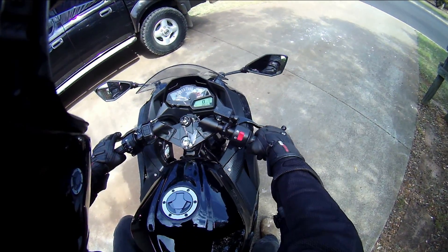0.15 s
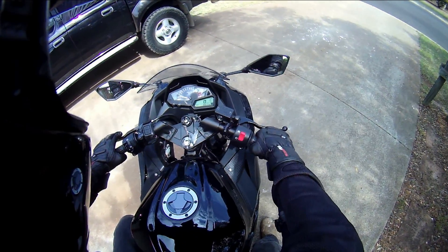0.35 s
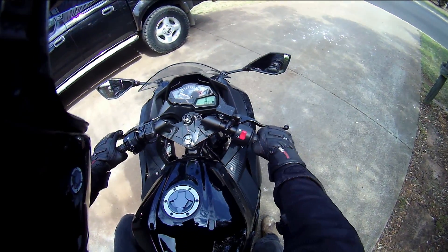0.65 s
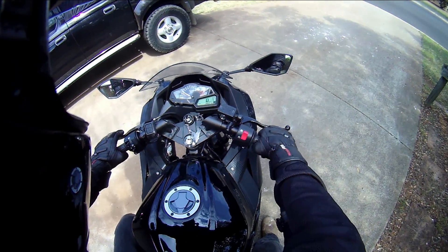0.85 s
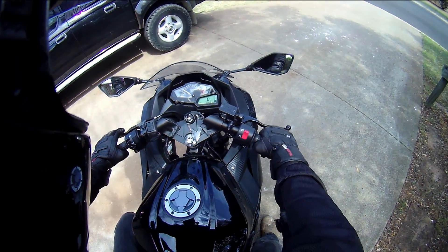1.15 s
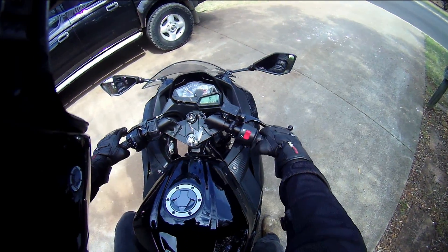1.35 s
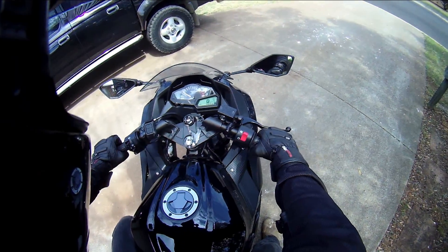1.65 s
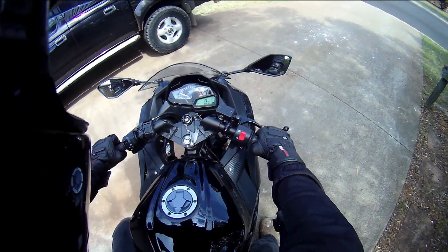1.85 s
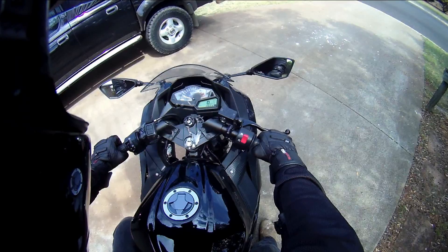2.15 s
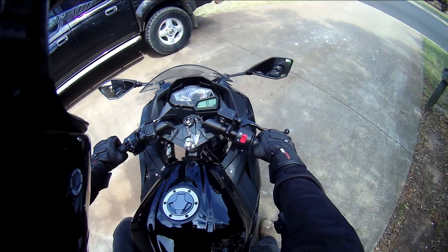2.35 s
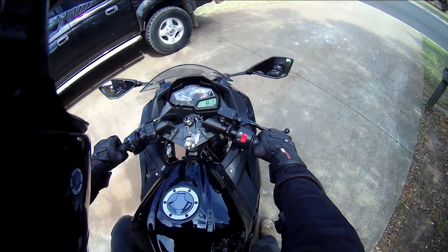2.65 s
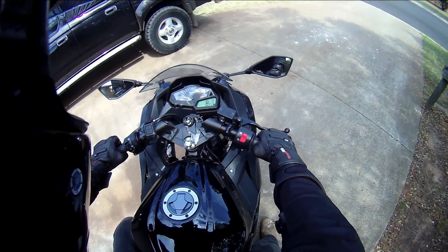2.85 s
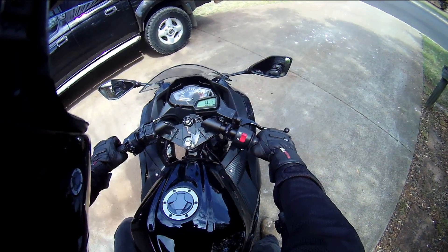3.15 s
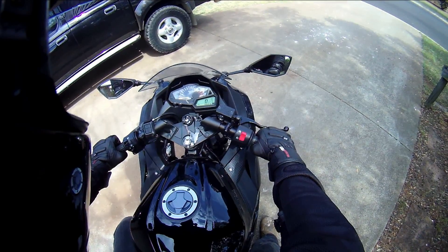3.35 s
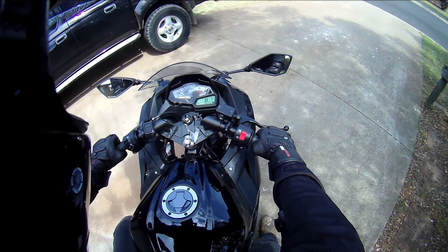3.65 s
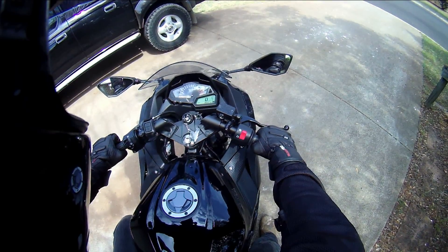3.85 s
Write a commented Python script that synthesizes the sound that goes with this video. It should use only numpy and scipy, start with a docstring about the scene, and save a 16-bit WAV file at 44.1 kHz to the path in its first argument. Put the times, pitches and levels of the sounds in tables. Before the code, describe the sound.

A small motorcycle engine idles, is revved twice, settles and shuts off, then a few clicks

```python
"""A quiet yard: a small two-cylinder motorcycle idles, is revved twice, settles and is switched off.
Its cylinders fire about a quarter cycle apart; each firing rings the exhaust pipe and leaves a rasp of gas.
With the throttle closed they mostly pump air, heard as smooth dips of pressure.
Random ticks and hiss through ringing cases make the engine's whir, and a panel buzzes for a while.
Switch and lever clicks follow, noise ringing metal; a thin far bird whistles over low rumble and hiss."""
import sys
import numpy as np
from scipy import signal
from scipy.fft import rfft, irfft
from scipy.io import wavfile
from scipy.ndimage import uniform_filter1d

SR = 44100
rng = np.random.default_rng(int(sys.argv[2]) if len(sys.argv) > 2 else 0)


def wav_out(sig):
    """Save sig, one row per channel (or a flat mono array), as 16-bit PCM at SR to the path in sys.argv[1]."""
    wavfile.write(sys.argv[1], SR, np.round(np.clip(np.atleast_2d(sig).T, -1, 1) * 32767).astype(np.int16))


N = 176400  # samples, 4 s


def amp(db):
    """Turns decibels into a plain multiplier."""
    return 10 ** (np.asarray(db) / 20)


def evened(x):
    """Brings a sound to an average (RMS) strength of 1."""
    return x / np.sqrt(np.mean(x ** 2) + 1e-20)


def curve(table, col=1, t=None):
    """Joins one column of a timed table with straight lines."""
    rows = np.array(table, float)
    times = np.arange(N) / SR if t is None else t
    return np.interp(times, rows[:, 0], rows[:, col])


def add(mix, s, sound):
    """Mixes a sound in at s seconds, cutting whatever falls outside."""
    at = round(s * SR)
    part = mix[max(at, 0):][:len(sound) + min(at, 0)]
    part += sound[max(-at, 0):][:len(part)]


def colour(x, points):
    """Strengthens or weakens each pitch by a (f/Hz, level/dB) table."""
    f, db = np.transpose(points)
    hz = np.fft.rfftfreq(len(x), 1 / SR)
    level = np.interp(np.log(hz + 1), np.log(f + 1), db)
    return irfft(rfft(x) * amp(level), len(x))


def resonate(x, hz, width):
    """Rings at a fixed or moving pitch, with gain 1; a narrower width rings longer."""
    turn = np.exp(2j * np.pi * np.cumsum(hz * np.ones(len(x))) / SR)
    r = np.exp(-np.pi * width / SR)
    return 2 * (turn * signal.lfilter([1 - r], [1, -r], x / turn)).real


def filtered(x, order, hz, kind="low"):
    """Lets through the lows, the highs or a band."""
    return signal.sosfilt(signal.butter(order, hz, kind, fs=SR, output="sos"), x)


# Engine speed: t/s, four-stroke cycles per second
SPEED = [(0.0, 13.32), (0.2, 12.92), (0.4, 13.19), (0.47, 16.36), (0.6, 23.7), (0.69, 28.44), (0.8, 23.26),
         (0.89, 18.57), (1.02, 26.99), (1.13, 34.37), (1.2, 30.57), (1.4, 22.81), (1.6, 17.19),
         (1.78, 13.48), (1.92, 12.29), (2.15, 13.29), (2.35, 13.19), (2.55, 13.63), (2.7, 6.94),
         (2.85, 13.35)]
START_CYCLE = .342  # how far into a cycle the engine starts


def crank():
    """Adds up the speed to give the cycles turned so far."""
    return START_CYCLE + np.cumsum(curve(SPEED)) / SR


# How hard the engine works: t/s, firing level/dB, second cylinder minus first/dB, air pumping level/dB
LOAD = [(0, -23.5, 0.5, -74), (.38, -22.5, 2, -30), (.45, -18, 5, -40), (.55, -11, 1, -25),
        (.65, -9, -4.5, -39), (.7, -10.5, -9, -48), (.73, -28.5, 7.5, -18.5), (.86, -33.5, 10.5, -23),
        (.92, -14.5, -1, -28), (1.0, -10.5, 0.5, -33), (1.09, -9, -1, -58), (1.15, -12, -17, -41),
        (1.18, -24, 1.5, -19), (1.3, -22, 3, -27.5), (1.54, -29.5, 6, -23), (1.59, -18.5, -0.5, -36),
        (1.65, -31, 7.5, -24), (1.72, -17.5, -0.5, -63), (1.9, -24.5, 3.5, -18.5), (2.55, -20.5, -1, -51),
        (2.6, -23, 2, -99)]
# Stray firings on closed throttle: t/s, level/dB
STRAYS = [(0.8476, -18.5), (.875, -20.5), (1.31, -18), (1.3593, -17), (1.4334, -20), (1.4515, -16),
          (1.4928, -26)]
SECOND = .238  # place of the second cylinder in the cycle
IGNITION_OFF_S = 2.556


def firings():
    """Each cylinder fires once per cycle until the ignition goes off; strays are added."""
    t, whole = np.arange(N) / SR, np.arange(-1, 51)
    # reach back before the start, so that earlier firings can still be ringing
    turns = np.r_[-2, crank()]
    times = np.r_[-(2 + START_CYCLE) / SPEED[0][1], t]
    first = np.interp(whole, turns, times)
    second = np.interp(whole + SECOND, turns, times)
    first_db = curve(LOAD, t=first)
    second_db = curve(LOAD, t=second) + curve(LOAD, col=2, t=second)
    both = zip(np.r_[first, second], np.r_[first_db, second_db])
    return [(s, db) for s, db in both if s < IGNITION_OFF_S] + list(STRAYS)


# Ringing notes after each firing, the lowest a deep 53 Hz boom, the rest the pipe's: f/Hz, level/dB for a -12
# dB firing, t60/s, extra dB per dB of firing
PIPE = [(53.37, -6, 0.29, -0.31), (131.8, -2, 0.037, -0.15), (280.2, -5.5, 0.079, 0.25),
        (356, -9.5, 0.073, 0.63), (458, -31.5, 0.1, 4.3), (550, -29.5, 0.0874, 0.5),
        (654.5, -34.5, 0.066, 2.2), (723, -33.5, 0.081, 0.68), (890, -34.5, 0.03, -0.2)]
# First swing of each pipe note: direction (+1 or -1), delay/s
SIGN_LAG = [(1, .0012), (-1, .0018), (-1, .003), (-1, .0031)] + [(-1, .0036)] * 5
# Colour of the rushing gas: f/Hz, level/dB
RASP = [(150, -33), (260, 2), (350, 0.5), (480, -4), (600, -14.5), (730, -9.5), (900, -20.5), (1500, -30),
        (2500, -40), (4000, -71)]
PORT_S, LEAD_S = .0009, .0053  # softness of the attack; how early each ring starts
SCATTER_DB, DETUNE = .7, .01  # random spread of loudness, and of pitch as a fraction
RASP_DB, RASP_FOLLOW = -21.5, 1.25  # rasp level; its dB per dB of firing
RASP_S, RASP_RISE_S = .029, .006  # fading and rising times
ECHO_S, ECHO_DB = .00926, -11.5


def exhaust():
    """Each firing rings the pipe and leaves a rasp of gas; the ground sends the ring back once."""
    t, rings, puffs = np.arange(SR // 3) / SR, np.zeros(N), np.zeros(N)
    rasp_rise = np.sin(np.pi / 2 * np.minimum(t / RASP_RISE_S, 1)) ** 2
    rasp_shape = np.exp(-t / RASP_S) * rasp_rise
    for s, db in firings():
        chance = rng.standard_normal(len(PIPE) + 1)
        ring = np.zeros(len(t))
        for (hz, mode_db, t60, gain), (sign, lag), z in zip(PIPE, SIGN_LAG, chance):
            u = np.maximum(t - lag, 0)
            fading = amp(mode_db + gain * (db + 12) - 60 * u / t60)
            attack = 1 - np.exp(-u / PORT_S)
            ring += sign * fading * attack * np.sin(2 * np.pi * hz * (1 + DETUNE * z) * u)
        add(rings, s - LEAD_S, amp(db + SCATTER_DB * chance[-1]) * ring)
        add(puffs, s - LEAD_S, amp(RASP_FOLLOW * db) * rasp_shape)
    back = round(ECHO_S * SR)
    echo = np.r_[np.zeros(back), rings[:-back]]
    gas = evened(colour(rng.standard_normal(N), RASP))
    return rings + amp(ECHO_DB) * echo + amp(RASP_DB) * puffs * gas


def dip(u):
    """A smooth suction dip with a swell on each side."""
    return (u ** 2 - 1) * np.exp(-u ** 2 / 2)


# Suction gulps of the unfired cylinders: t/s, level/dB before the deep note's ring is added
GULPS = [(2.567, -23), (2.63, -25.5), (2.655, -25), (2.748, -29), (2.791, -31)]
GULP_S = .0016
PUMP_LAG, PUMP_WIDTH = .18, .07  # cycles
PUMP_RING_DB, GULP_RING_DB = -16, 13.5  # how hard each drives the deep 53 Hz note
SURGE_ORDER, SURGE_WIDTH_HZ, SURGE_DB = 3.76, 8.3, -1  # order: surges per cycle


def pumping():
    """Each cylinder sucks once per cycle; the air surges on, and pumping and gulps ring a deep 53 Hz note."""
    t, turns = np.arange(N) / SR, crank() - PUMP_LAG
    pumped = np.zeros(N)
    for place in (0, SECOND + .02):
        from_dip = (turns - place + .5) % 1 - .5
        pumped += dip(from_dip / PUMP_WIDTH)
    pumped *= amp(curve(LOAD, col=3))
    pumped += amp(SURGE_DB) * resonate(pumped, SURGE_ORDER * curve(SPEED), SURGE_WIDTH_HZ)
    gulps = sum(-amp(db) * np.exp(-((t - s) / GULP_S) ** 2 / 2) for s, db in GULPS)
    hz, t60 = PIPE[0][0], PIPE[0][2]
    push = amp(PUMP_RING_DB) * pumped + amp(GULP_RING_DB) * gulps
    return pumped + gulps + resonate(push, hz, 2.2 / t60)


# Colour of the valve gear and cases: f/Hz, level/dB
CLATTER = [(290, -9), (500, -3.5), (603, 0), (676, -7), (781, -5), (1040, -6), (1190, -13), (1770, -13),
           (3110, -24), (3800, -21.5), (6560, -31.5), (10100, -34), (15600, -40)]
# Ringing notes of the cases: f/Hz, width/Hz of the first of two passes, level/dB relative to each other
CASES = [(1365, 260, 0), (3720, 340, -6), (4050, 220, -4.5), (5350, 600, -22.5), (10040, 1500, -18)]
# Mechanical noise: t/s, level/dB, treble change/dB, bass change/dB
WHIR = [(.03, -57, 1, 2), (.29, -58, -1, -4), (.49, -54.5, 1.5, 1), (.64, -51.5, 3, -2),
        (.88, -57.5, 3, -0.5), (1.1, -47.5, 0.5, 7.5), (1.46, -58, 4, -2.5), (1.85, -57.5, -2, -2),
        (2.19, -61, 2, 2), (2.5, -61, 3, 2.5), (2.65, -63, -2.5, 8), (2.78, -68.5, -4, 9.5),
        (2.9, -73.5, -6, 7)]
# Buzzing panel: t/s, level/dB
BUZZ = [(0, -70.5), (1.55, -85), (1.64, -60.5), (1.85, -64.5), (2.1, -63), (2.3, -90.5), (2.6, -95.5)]
TICKS_PER_CYCLE, TICK_DB, THROB = 23, .5, .1  # average count; random spread of level; depth of the swell
BUZZ_HZ, BUZZ_WIDTH_HZ, BUZZ_WAVER = 1756, 250, .015  # waver: spread of pitch as a fraction


def mechanics():
    """Random ticks and hiss swell once per cycle through the ringing cases; a panel buzzes for a while."""
    hit = rng.random(N) < TICKS_PER_CYCLE * curve(SPEED) / SR
    ticks = hit * amp(TICK_DB * rng.exponential(1, N))
    drive = evened(rng.standard_normal(N) + .5 * evened(ticks * rng.standard_normal(N)))
    drive *= 1 + THROB * np.cos(2 * np.pi * (crank() - .15))
    body = colour(drive, CLATTER)
    for hz, width, db in CASES:
        body = body + amp(db - 19) * resonate(resonate(drive, hz, width), hz, 2 * width)
    body = filtered(body, 2, 220., "high")
    body = filtered(body, 3, 13500.)
    treble = filtered(body, 2, 3000., "high")
    bass = filtered(body, 2, 800.)
    scale = np.std(filtered(body, 2, 900., "high"))  # levels are set by the part above 900 Hz
    whir = body + (amp(curve(WHIR, col=2)) - 1) * treble + (amp(curve(WHIR, col=3)) - 1) * bass
    whir *= amp(curve(WHIR)) / scale
    waver = evened(uniform_filter1d(rng.standard_normal(N), size=2000))
    hz = BUZZ_HZ * (1 + BUZZ_WAVER * waver)
    buzz = evened(resonate(resonate(drive, hz, BUZZ_WIDTH_HZ), hz, BUZZ_WIDTH_HZ))
    fade = np.clip((3 - np.arange(N) / SR) * 10, 0, 1)  # silent from 3 s on
    return (whir + buzz * amp(curve(BUZZ))) * fade


# Colour of the yard's background: f/Hz, level/dB
YARD = [(12, -20), (20, 3), (38, -1), (85, -18), (122, -15), (162, -20.5), (315, -25.5), (362, -31),
        (908, -40.5), (1200, -46), (15600, -57.5)]
YARD_DB = -54


def yard():
    """Random noise, coloured into a low rumble and faint hiss."""
    return amp(YARD_DB) * evened(colour(rng.standard_normal(N), YARD))


# Switches and levers: t/s, level/dB, brightness/dB per octave, bottom f/Hz, top f/Hz, rise/s, fading time/s
CLICKS = [(2.544, -56, -1, 600, 11000, 0.013, 0.035), (2.804, -56, -5.5, 1400, 14000, 0.0013, .01),
          (2.914, -56.5, -2, 895, 7760, 0.00076, 0.017), (2.933, -62.5, -4, 408, 2200, 0.014, 0.058),
          (2.995, -62.5, -4.5, 400, 2200, 0.0022, 0.012), (3.034, -53, -4, 1380, 2600, 0.0019, 0.0057),
          (3.242, -71.5, 7.5, 3000, 9000, 0.0056, 0.017)]
# Ringing notes of a lever: f/Hz, level/dB before longer rings are raised, ring length/s (t60 is 0.55 of it)
LEVER = [(786, 5.5, 0.026), (1350, 5, 0.016), (1710, -7.5, .045), (2560, -11, 0.0099), (3100, -8, 0.034),
         (4050, -26.5, .02), (6150, -18, .012), (8000, -28, 0.011), (9500, -18, .01), (11800, -15, .015)]
GRAINS_PER_S, SCRAPE_DB = 3800, -4


def clicks():
    """A short grainy rattle rings the lever's notes, with some plain scrape."""
    t, out = np.arange(SR // 6) / SR, np.zeros(N)
    for s, db, bright_db, bottom_hz, top_hz, rise, length in CLICKS:
        grain = rng.random(len(t)) < GRAINS_PER_S / SR
        noise = rng.standard_normal(len(t)) * (.22 + 3 * grain)
        rattle = noise * np.exp(-t / length) * np.minimum(t / rise, 1)
        click = amp(SCRAPE_DB) * filtered(rattle, 1, [500., 5000.], "band")
        for hz, note_db, ring_s in LEVER:
            level = amp(note_db + bright_db * np.log2(hz / 2000)) * np.sqrt(ring_s * 1000)
            click += level * resonate(rattle, hz, 4 / ring_s)
        # each click starts 1 ms ahead of its listed time
        add(out, s - .001, amp(db) * filtered(click, 3, [bottom_hz, top_hz], "band"))
    return out


# Bird whistle: t/s, first voice f/Hz, second voice f/Hz, level/dB of each voice
BIRD = [(3.76, 4150, 4200, -100), (3.81, 4140, 4650, -83), (3.85, 4060, 5050, -85), (3.88, 4100, 4580, -79),
        (3.93, 3280, 3970, -89)]


def bird():
    """Noise through two gliding, 180 Hz wide resonances gives two thin, slightly fuzzy whistles."""
    t = np.arange(N) / SR
    on = (t > BIRD[0][0]) & (t < BIRD[-1][0])
    voices = [evened(resonate(rng.standard_normal(N), curve(BIRD, col=k), 180.)) for k in (1, 2)]
    return sum(voices) * amp(curve(BIRD, col=3)) * on


def scene():
    """Adds all the sounds into one channel."""
    return (exhaust() + pumping() + mechanics() + yard() + clicks() + bird())[None]


EDGE_HZ = 15650  # top of the microphone's range


def record(dry):
    """The microphone rolls off the bass, then a sharp filter limits the top."""
    x = filtered(dry, 2, 30., "high")
    low_pass = signal.firwin(1023, EDGE_HZ, window=("kaiser", 9), fs=SR)
    return signal.oaconvolve(x, low_pass[None], "same")


dry = scene()
out = record(dry)
wav_out(out)
```